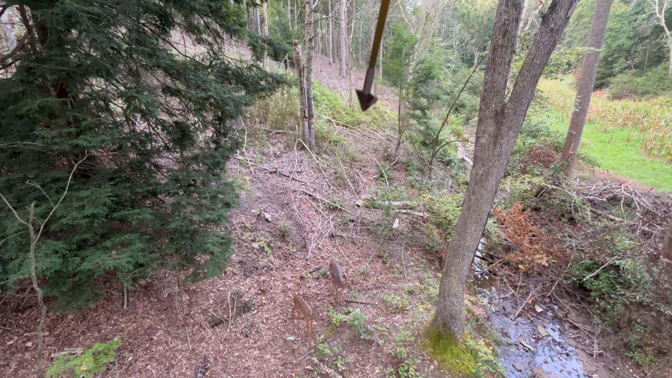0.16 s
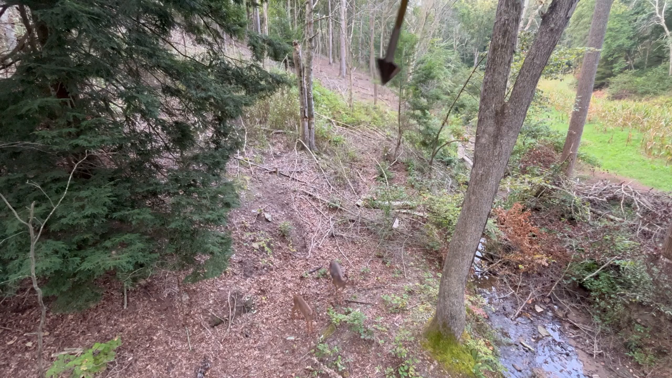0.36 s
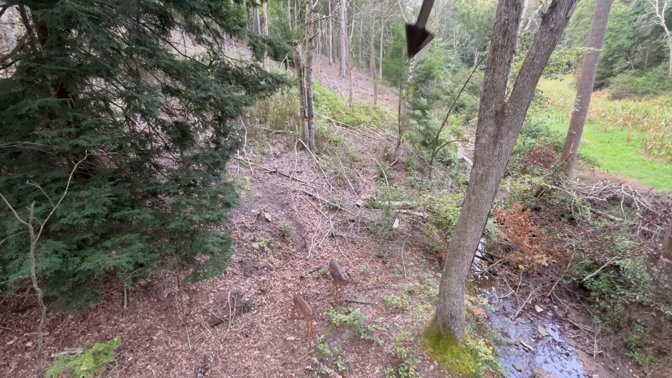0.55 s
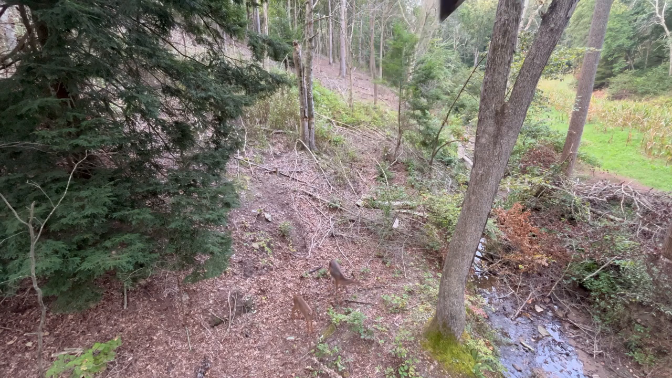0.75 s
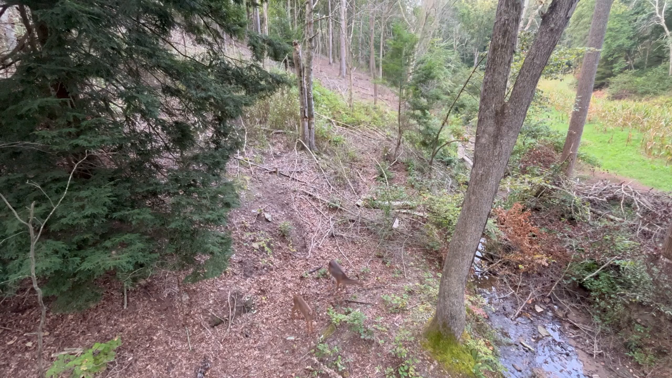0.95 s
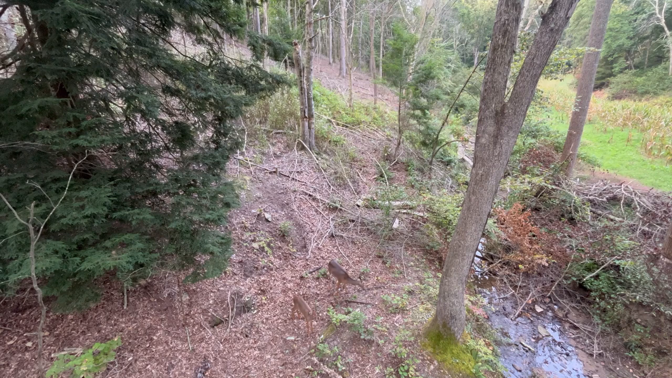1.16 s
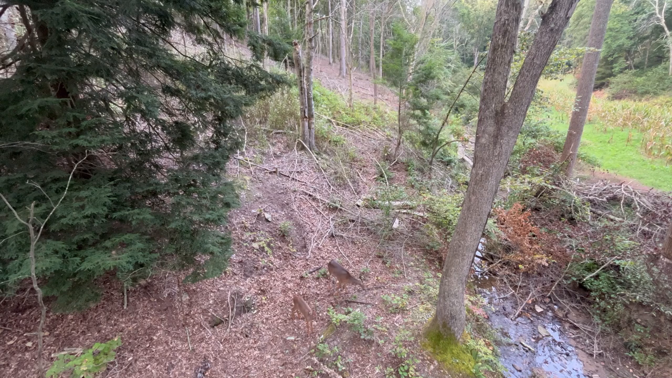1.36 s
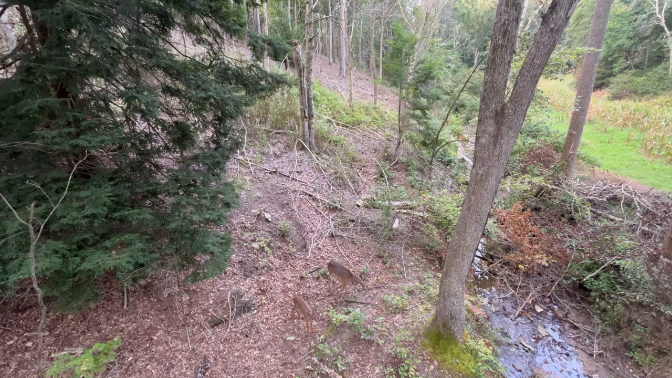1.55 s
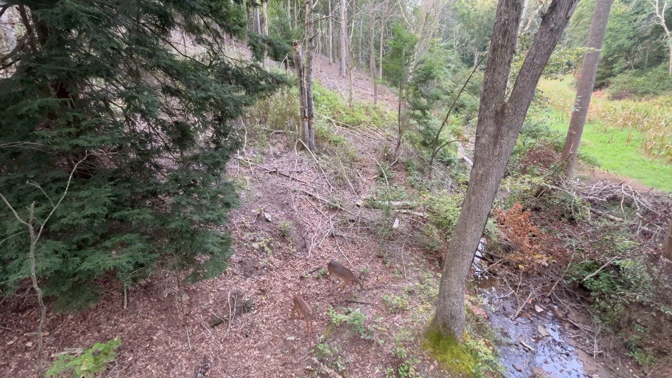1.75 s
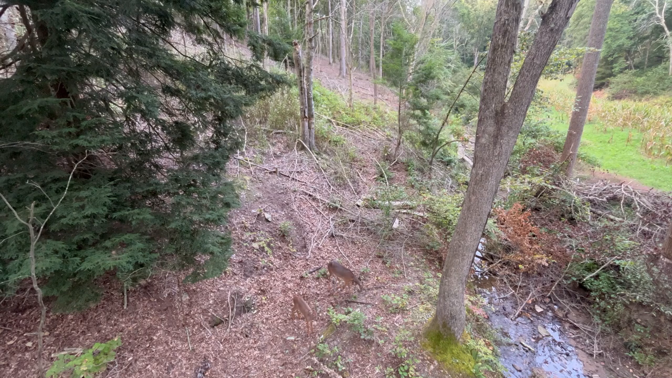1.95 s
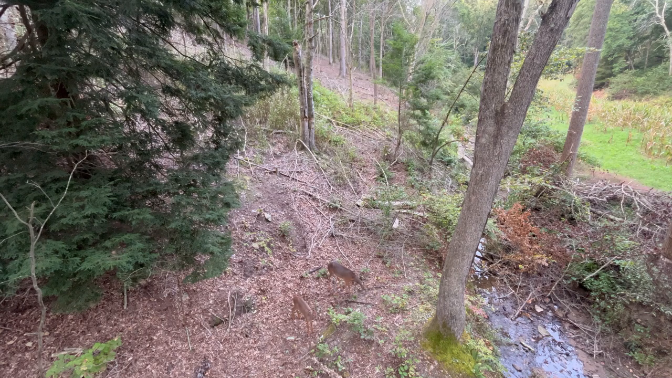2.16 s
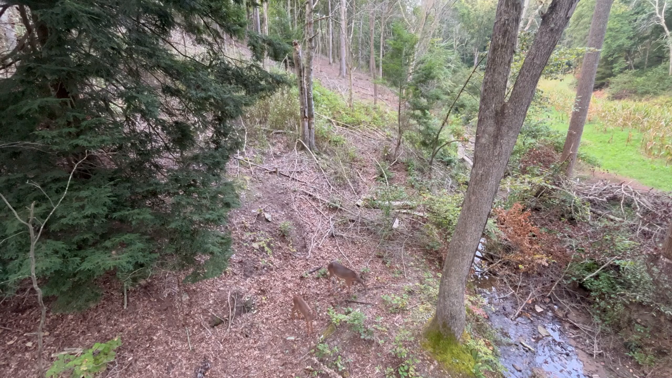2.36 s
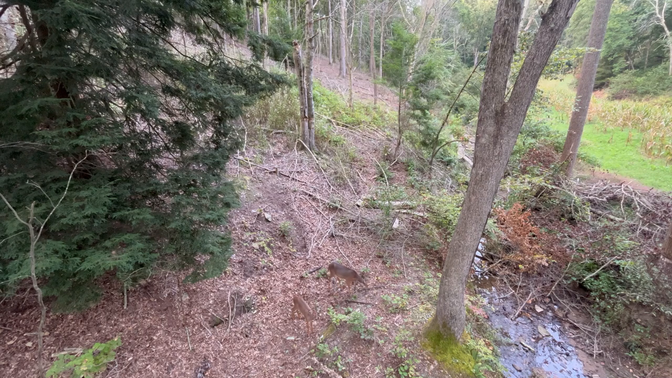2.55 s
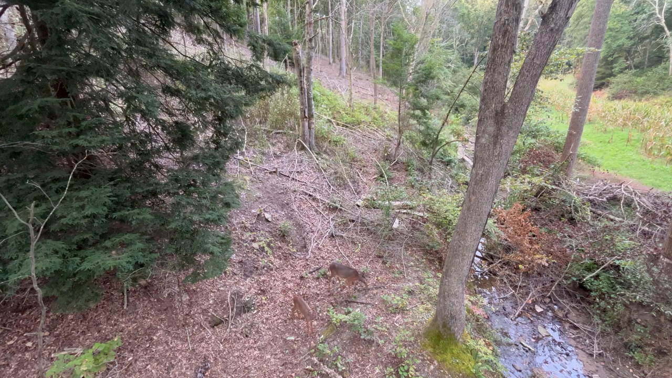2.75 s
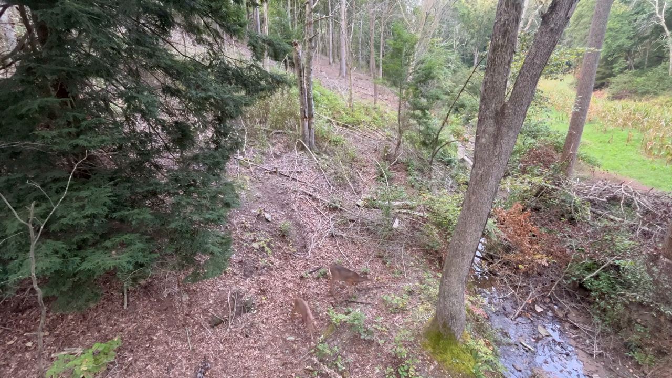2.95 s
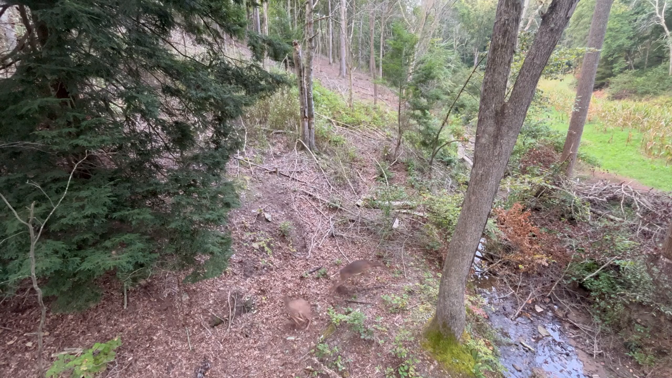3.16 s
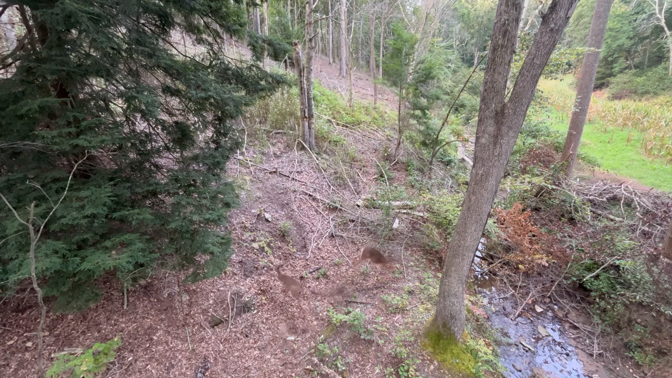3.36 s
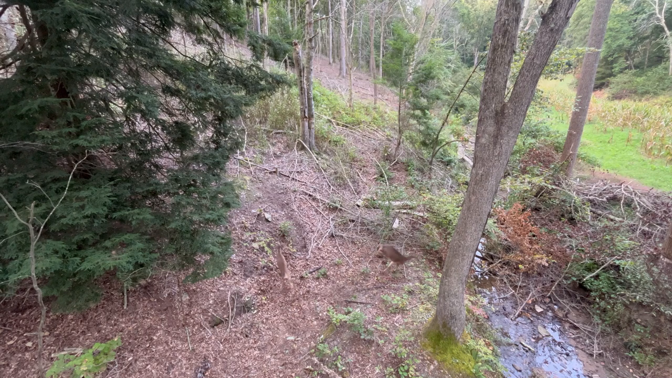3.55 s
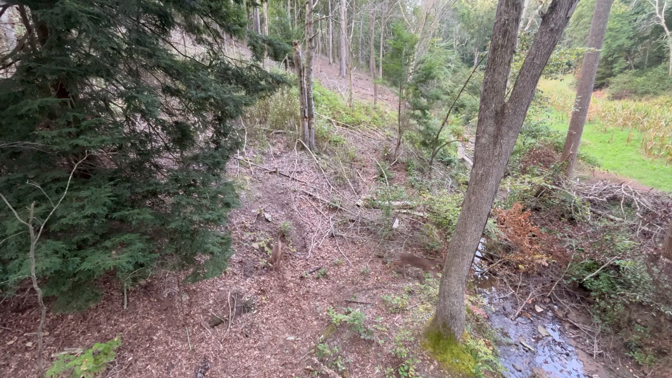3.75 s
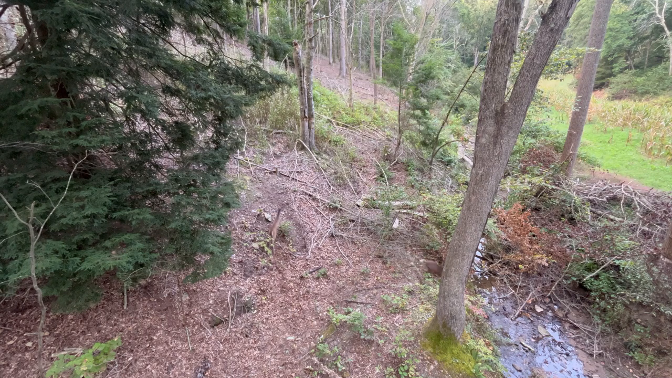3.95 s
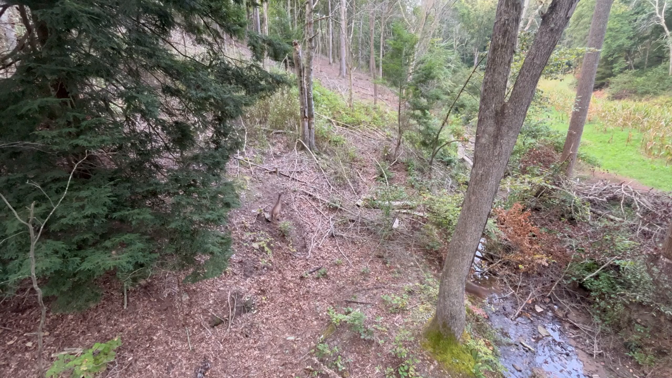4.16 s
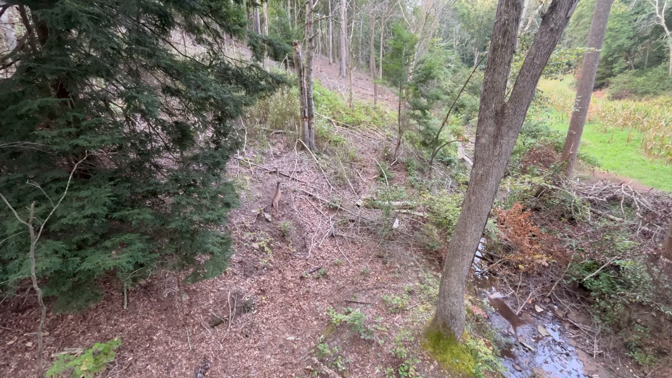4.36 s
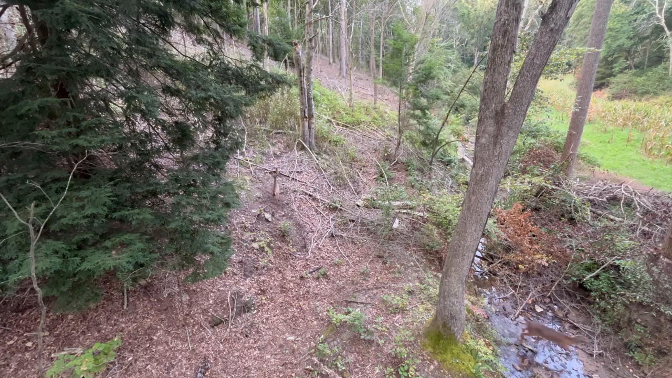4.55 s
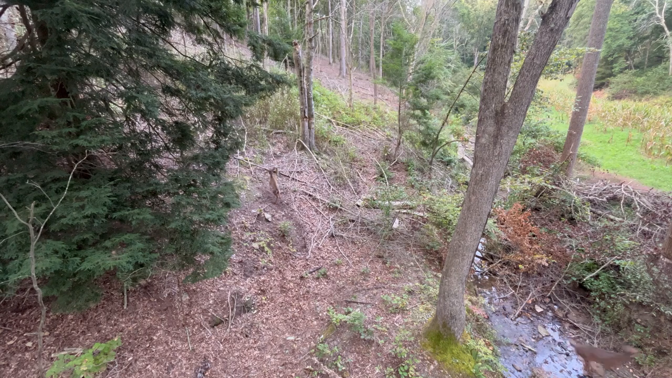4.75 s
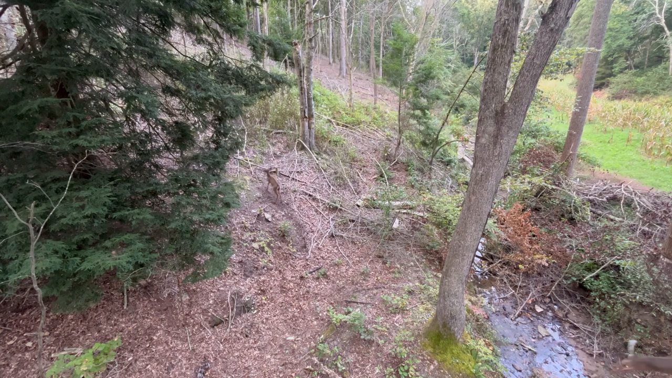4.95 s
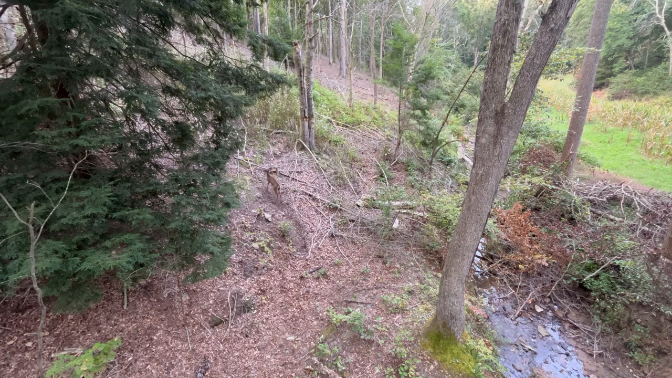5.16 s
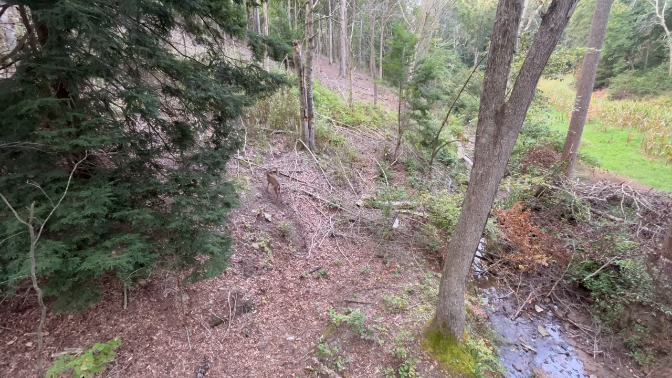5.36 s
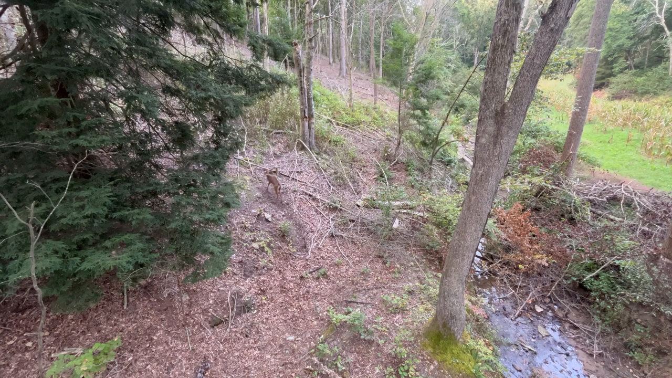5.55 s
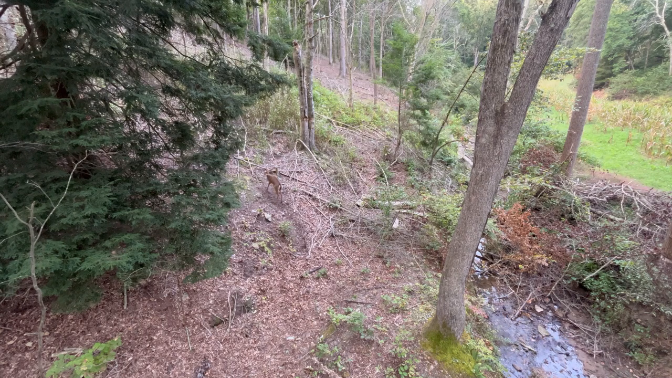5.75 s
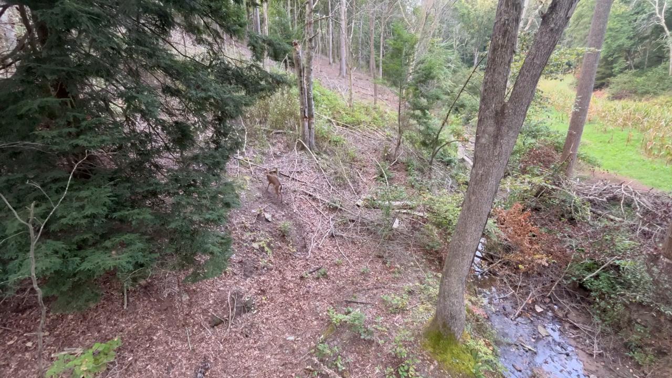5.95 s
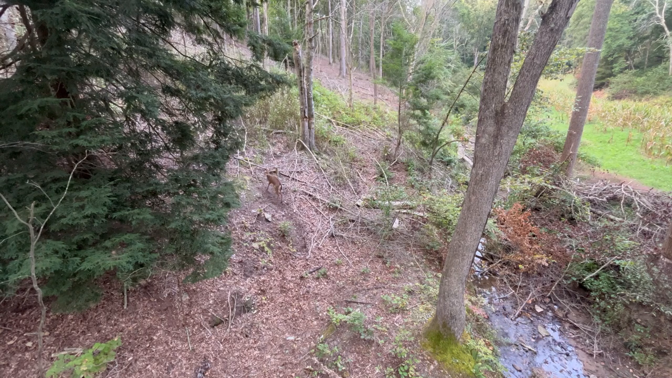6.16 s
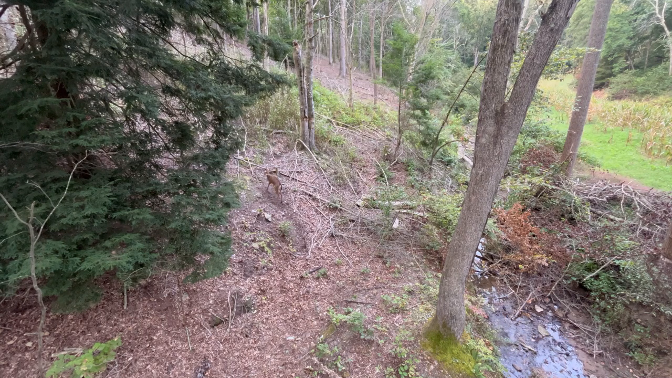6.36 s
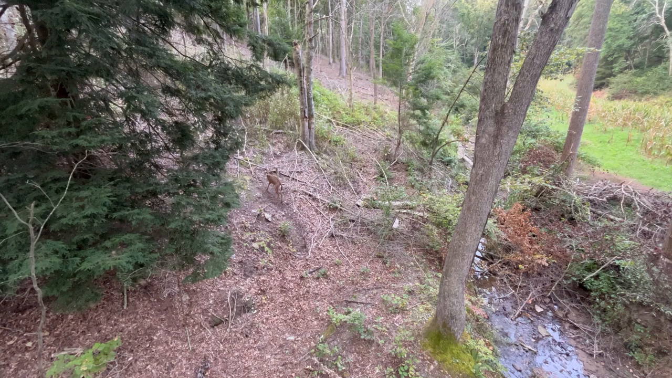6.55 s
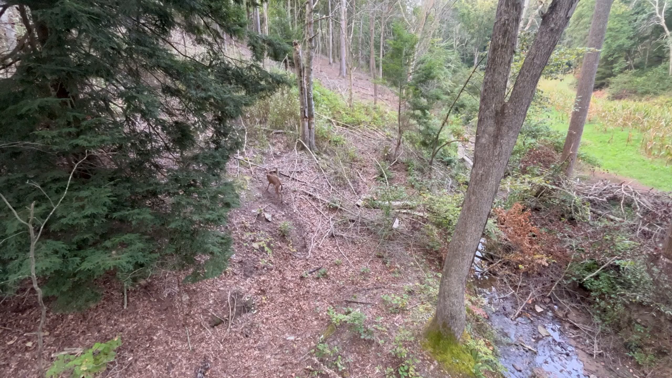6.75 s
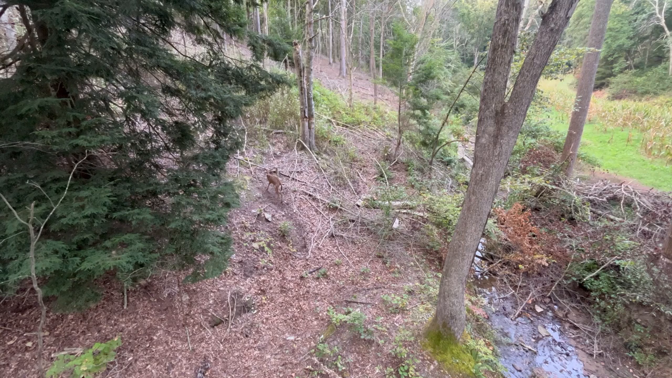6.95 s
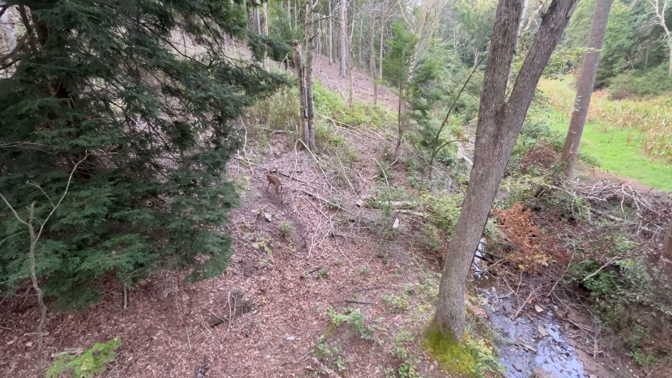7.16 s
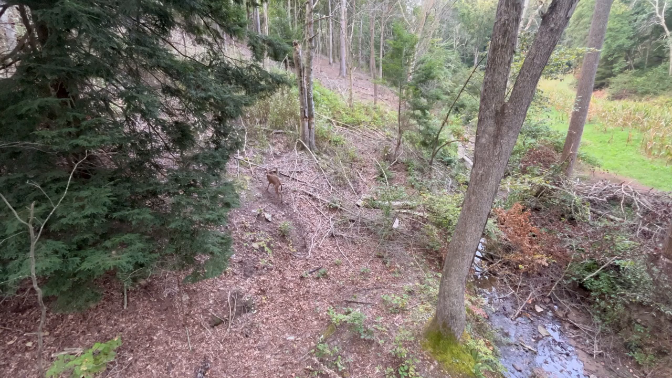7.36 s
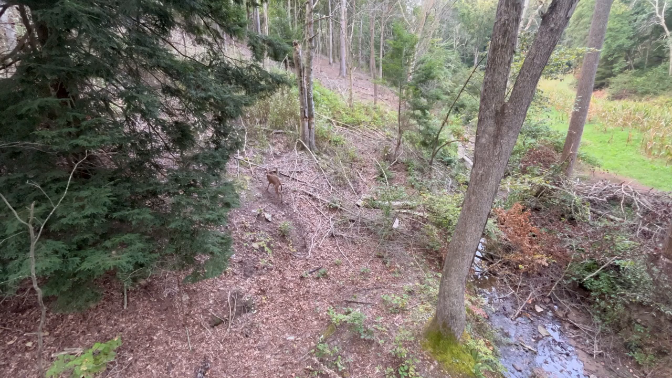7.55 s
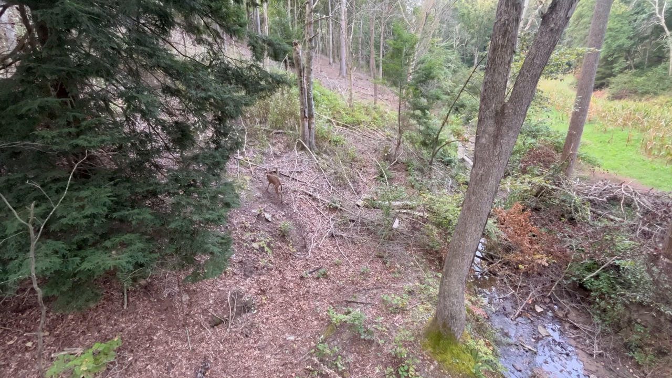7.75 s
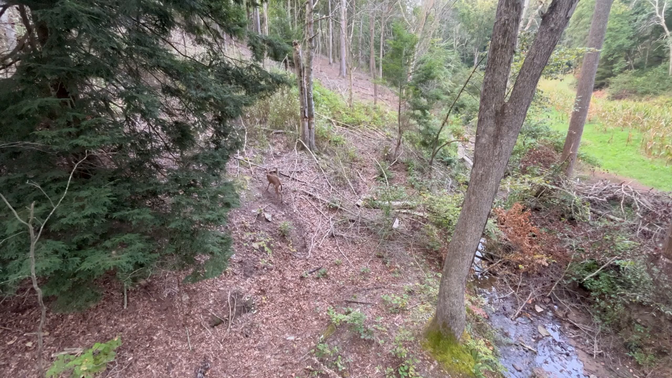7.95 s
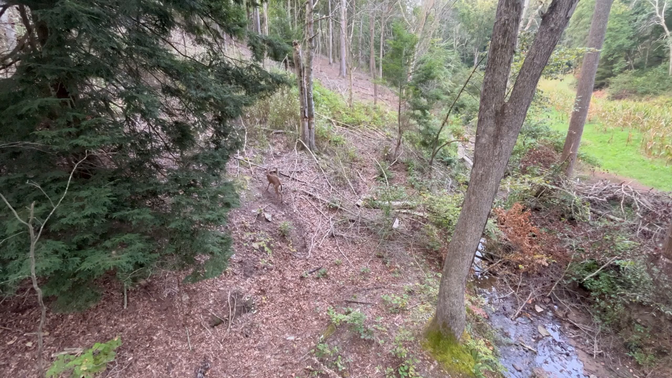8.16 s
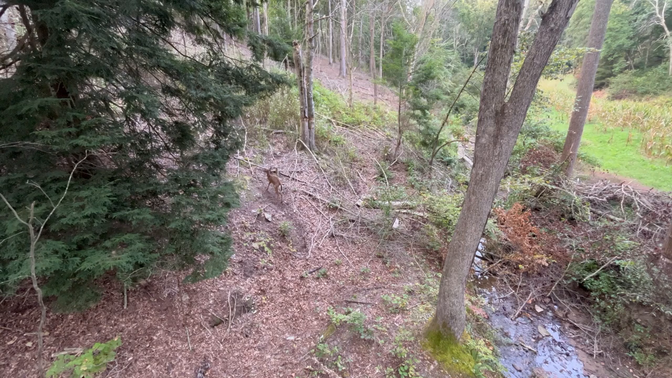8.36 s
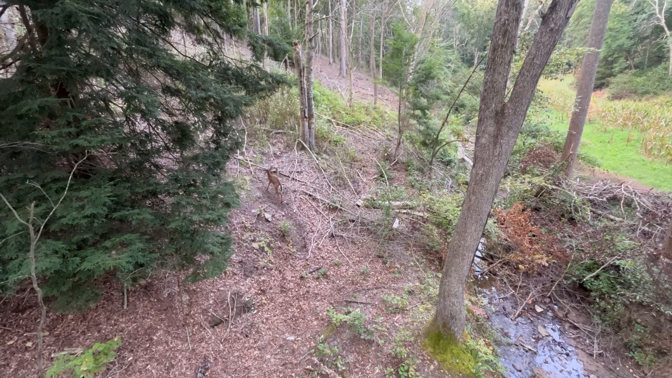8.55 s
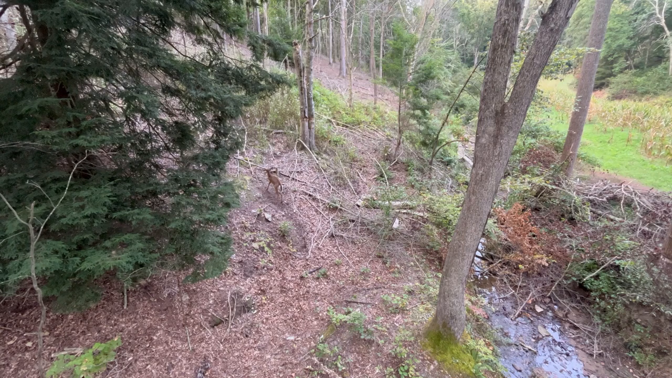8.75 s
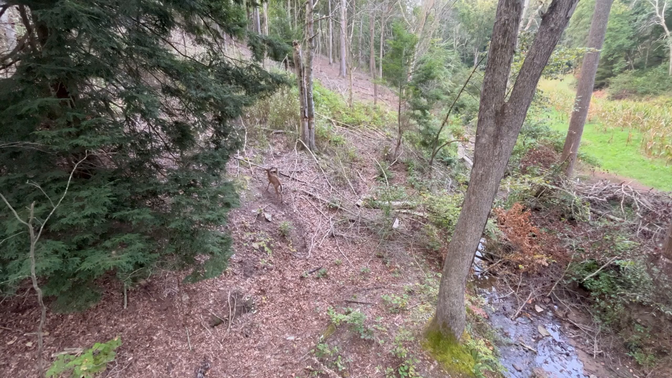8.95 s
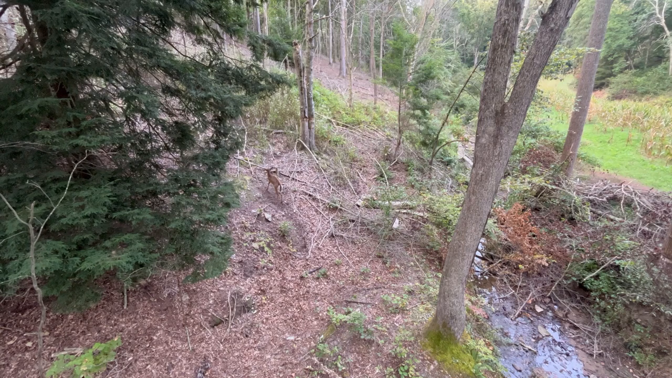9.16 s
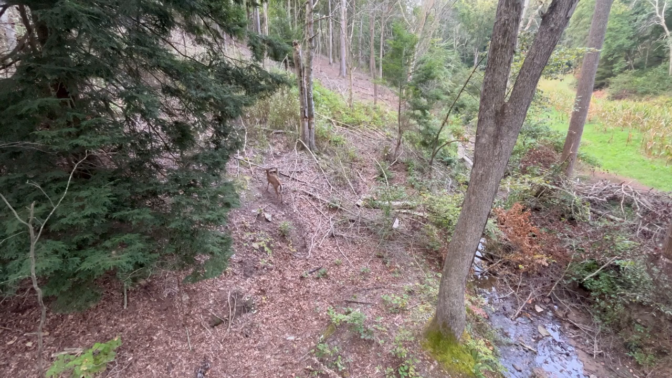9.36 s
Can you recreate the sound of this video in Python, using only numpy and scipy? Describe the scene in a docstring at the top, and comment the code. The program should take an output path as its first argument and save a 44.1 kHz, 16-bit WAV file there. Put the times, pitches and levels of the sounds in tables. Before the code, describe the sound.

Quiet woodland with a steady high insect trill, a nearer cricket chirping and soft air. A few faint leaf steps, then a hard, close bow thump with a brief rattling scrape. A deer bolts at once, crunching dry leaves and snapping twigs, the steps slowing and thinning. One short breathy snort follows, then sparse light footfalls under the insects. Stereo outdoor pickup near the bow, with faint echoes from the trees.

```python
"""In the woods a bow is loosed from a tree stand; a deer bolts through dry leaves, stops, snorts and steps about.
The bow is struck modes and a gritty scrape, the leaves are shaped crackle, the snort is noise in resonances.
A chorus of far insects trills around 4-5 kHz with one nearer cricket chirping, over far birds and a hush of air.
Two microphone ports with different colour hear the scene; the trees return a short tail of sparse echoes."""
import sys
import numpy as np
from scipy import signal
from scipy.fft import rfft, irfft
from scipy.io import wavfile
from scipy.ndimage import uniform_filter1d

SR = 44100
rng = np.random.default_rng(int(sys.argv[2]) if len(sys.argv) > 2 else 0)


def put_to_file(sound):
    """Save the sound as 16-bit audio at rate SR, in the file named by the first command-line argument."""
    columns = np.atleast_2d(sound).T  # one column per channel
    safe = np.clip(columns, -1, 1)
    whole_steps = np.round(safe * 32767)
    wavfile.write(sys.argv[1], SR, whole_steps.astype(np.int16))


def convert_level_to_amplitude(level_db):
    """Map a level in decibels to its linear amplitude factor."""
    exponent = np.asarray(level_db, float) / 20
    return 10 ** exponent


N = 414540


def evened(x):
    """Scales to rms 1."""
    return x / np.sqrt(np.mean(x ** 2) + 1e-20)


def read(points, hz):
    """Reads a spectrum table on a log-frequency axis."""
    f, value = np.transpose(points)
    return np.interp(np.log(hz + 1), np.log(f + 1), value)


def curve(points, t):
    """Reads a table as straight lines between its points."""
    return np.interp(t, *np.transpose(points))


def add(mix, s, sound):
    """Mixes a sound in at time s."""
    part = mix[..., round(s * SR):][..., :sound.shape[-1]]
    part += sound[..., :part.shape[-1]]


def colour(x, points):
    """Filters by a spectrum table."""
    hz = np.fft.rfftfreq(x.shape[-1], 1 / SR)
    return irfft(rfft(x) * convert_level_to_amplitude(read(points, hz)), x.shape[-1])


def tilt(hz, treble_db, bass_db, treble_hz, bass_hz):
    """Tips the treble from one edge up to 8 kHz and the bass below another edge."""
    treble = np.clip(np.log((hz + 1) / treble_hz) / np.log(8000 / treble_hz), 0, 1)
    bass = np.clip(np.log2(bass_hz / (hz + 1)) / 0.31, 0, 1)
    return np.multiply.outer(treble_db, treble) + np.multiply.outer(bass_db, bass)


def peak_db(t, top_s, top_db, rise, fade):
    """A level that climbs to its top and sinks again, in dB per second."""
    return top_db - np.where(t < top_s, rise * (top_s - t), fade * (t - top_s))


def slow(size):
    """A slowly wandering random curve of rms 1."""
    smooth = uniform_filter1d(rng.standard_normal(N), size)
    return evened(uniform_filter1d(smooth, size))


def resonate(x, hz, width):
    """Shifts the curve hz down to zero, smooths, and shifts back: a resonance of gain 1."""
    turn = np.exp(2j * np.pi * np.cumsum(hz * np.ones(len(x))) / SR)
    r = np.exp(-np.pi * width / SR)
    return 2 * (turn * signal.lfilter([1 - r], [1, -r], x / turn)).real


def ports(x, side, lead=((0, 0), (20000, 0))):
    """Splits a sound by level and phase; the sum keeps its level unless the ports nearly cancel."""
    hz = np.fft.rfftfreq(N, 1 / SR)
    ratio = convert_level_to_amplitude(read(side, hz))
    left = ratio * np.exp(1j * curve(lead, hz))
    both = np.array([left, np.ones(len(hz))])
    total = np.maximum(abs(both.sum(0)), 0.61 * np.sqrt(1 + ratio ** 2))
    return irfft(rfft(x) * both * 2 / total, N)


# blows inside the bow; a long contact rings only the low modes:
# (time [s], relative force [dB], contact [ms])
BLOWS = [(2.7578, -10.5, 0.32), (2.7598, -8, 1.36), (2.766, -8.5, 1.93), (2.7709, -6, 0.13),
         (2.776, -10, 0.11), (2.783, -1.5, 5.1), (2.7882, -5.5, 0.2), (2.798, -24.5, 0.32),
         (2.8, -9.5, 1.86), (2.808, -20, 0.15), (2.803, -4.5, 11), (2.83, -23, 0.074), (2.88, -25, 0.078),
         (2.898, -30.5, 0.2), (3.0, -23.5, 7.3), (3.067, -26.5, 3.4)]
# modes of limbs, riser and arrow rest: (frequency [Hz], relative level [dB], t60 [s])
BOW_MODES = [(61, -3.5, 0.15), (93, -9, 0.31), (124, -4.5, 0.045), (192, -4, 0.04), (300, -13.5, .05),
             (344, -14.5, 0.071), (440, 0.5, 0.07), (670, -11, 0.091), (800, -3.5, 0.036), (900, -5, 0.036),
             (1140, -5, 0.025), (1810, -15.5, 0.044), (2282, -12, 0.27), (2750, -4, 0.035),
             (3315, -2, 0.05), (4010, 1.5, 0.019), (4900, -3, 0.017), (6500, -7.5, 0.028),
             (7800, -1.5, .015)]


def bow_ring():
    """Each blow is a force pulse, a push and its rebound, that sets the bow's modes ringing."""
    t, force = np.arange(SR // 2) / SR, np.zeros(N)
    for s, db, contact_ms in BLOWS:
        push = np.diff(np.hanning(max(round(contact_ms * SR / 1000), 2) + 2))
        add(force, s, convert_level_to_amplitude(db) * push / abs(push).sum())
    out = np.zeros((2, N))
    for hz, db, t60 in BOW_MODES:
        # the ports hear each mode at different phases, more scattered the higher it lies
        phase = np.array([[0], [0.71 + hz / 1500 * rng.standard_normal()]])
        ring = convert_level_to_amplitude(db - 60 * t / t60) * np.sin(2 * np.pi * hz * t + phase)
        out += signal.oaconvolve(force[None], ring, axes=1)[:, :N]
    return 0.36 * out


# colour of the scrape: (frequency [Hz], relative level [dB])
SCRAPE_TONE = [(180, -38.5), (300, -9), (455, -6), (574, -6.5), (2000, -13.5), (2840, -12), (3700, -12.5),
               (7690, -15), (16000, -45.5)]
# the slide snags in bursts: (time [s], level [dB])
CATCHES = [(2.758, -11.5), (2.765, -20.5), (2.771, -13), (2.778, -13.5), (2.788, -21.5), (2.88, -35),
           (2.897, -36), (2.944, -40)]


def scrape():
    """String and arrow slide past the rest: a gritty hiss that swells, fades and stops, with snags."""
    t = np.arange(N) / SR
    grit = rng.standard_normal((2, N)) * convert_level_to_amplitude(3.5 * slow(size=40))
    end_s = 2.908
    slide_db = peak_db(t, 2.76, -30, rise=1900, fade=111) - 1500 * np.maximum(t - end_s, 0)
    level = convert_level_to_amplitude(slide_db)
    for s, db in CATCHES:
        level = level + convert_level_to_amplitude(peak_db(t, s, db, rise=9000, fade=3500))
    return evened(colour(grit, SCRAPE_TONE)) * level


# balance of the bow: (frequency [Hz], left over right [dB])
BOW_SIDE = [(60, -6), (130, -4.5), (290, 0), (640, 0), (1410, -3), (3100, -11), (6820, -5), (15000, 1)]


def bow():
    """Struck modes with the scrape under them, each channel coloured by its own port."""
    out = bow_ring() + scrape()
    return np.array([ports(out[k], BOW_SIDE)[k] for k in range(2)])


# phase between the ports for the deer: (frequency [Hz], left leads by [rad])
DEER_LEAD = [(0, 0), (3270, -9.5), (4820, -14.5), (6800, -15.5), (10200, -27.5), (15800, -27),
             (16200, -20.5)]


def crackle():
    """Dense random clicks over noise, partly shared by the ports."""
    clicks = convert_level_to_amplitude(4.5 * np.minimum(rng.exponential(1, (3, N)), 4)) * rng.standard_normal((3, N))
    clicks *= rng.random((3, N)) < 3500 / SR  # about 3500 clicks a second
    bed = evened(clicks) + 0.6 * rng.standard_normal((3, N))
    bed *= convert_level_to_amplitude(1.5 * slow(size=200))  # leaves give way in clumps
    level_sides = ((1, 0.0022), (20000, 0))  # practically equal level in both ports
    return 0.38 * ports(bed[0], level_sides, DEER_LEAD) + 0.8 * bed[1:]


# rustling bed: loud as the deer bolts, sinking, swelling softly again as the snort dies away:
# (time [s], level [dB])
RUSTLE = [(0, -71.5), (1.9, -70.5), (2.3, -78.5), (2.85, -75), (2.9, -59), (3.1, -52.5), (3.25, -60.5),
          (3.8, -57.5), (3.95, -58.5), (4.8, -65.5), (5.3, -65.5), (5.65, -74), (6.2, -68.5), (6.9, -75.5),
          (9.4, -76.5)]
BUSY_DB = -56.5  # the bed level from which crispness, weight and rumble are reckoned
# single steps and scuffs:
# (time [s], crunch level [dB], length [s], dryness as treble [dB], weight as bass [dB])
STEPS = [(0.074, -55.5, 0.02, -7, 6), (0.347, -62.5, 0.0033, 6, 14.5), (1.284, -53, 0.021, -15.5, -11),
         (1.795, -55, 0.031, -15, -4.5), (2.086, -72, 0.032, -9, 18.5), (2.952, -52.5, 0.0054, 7.5, -10),
         (3.002, -41, 0.011, -1.5, 6.5), (3.073, -40, 0.023, -10.5, -3.5), (3.163, -51.5, .009, 8, 2),
         (3.305, -44, 0.0044, 3.5, -12), (3.532, -52.5, 0.031, 3, -0.5), (3.627, -47.5, 0.03, 3, -11),
         (3.754, -48.5, 0.081, -1, -5.5), (3.996, -40.5, 0.025, -17, -11), (4.283, -56, 0.029, 2, -6),
         (4.442, -37, 0.015, -19, -14), (4.59, -43.5, 0.023, -6.5, -11), (4.717, -42, 0.017, -10, -16),
         (4.879, -39.5, 0.014, -14.5, -5), (5.059, -50.5, 0.024, 0, -14), (5.15, -48.5, 0.029, -8, -25),
         (5.325, -45.5, 0.016, -3, -3.5), (5.352, -53.5, 0.026, -1.5, 2.5), (6.286, -52.5, 0.02, -10, -5.5),
         (6.6, -62.5, 0.024, -9.5, 2), (6.754, -59, .026, -8.5, -3.5), (7.227, -60.5, 0.036, -7, -0.5),
         (7.854, -55, 0.015, 2.5, -4), (8.091, -62.5, 0.041, -16.5, -0.5), (8.491, -62, 0.015, -1, -9.5),
         (8.798, -58, 0.027, -5.5, -4), (8.291, -74, .018, -9.5, -6), (9.025, -65.5, 0.042, -24, -7),
         (9.312, -63.5, 0.04, -24.5, -3)]
# colour of the leaves: (frequency [Hz], relative level [dB])
LEAVES = [(24, -26), (40, -2), (99, 2.5), (185, -6), (297, -0.5), (363, -9.5), (942, -14), (1040, -15),
          (2150, -13), (3560, -14.5), (8990, -12.5), (12800, -28.5), (15600, -20.5), (16100, -44.5)]
# balance of the deer: (frequency [Hz], left over right [dB])
DEER_SIDE = [(60, 5), (120, -7.5), (240, 2.5), (480, 1.5), (950, 3), (1890, 2.5), (3770, -9), (7520, -1),
             (15000, 1)]
# how the rustling shifts between the sides as the deer moves: (time [s], left over right [dB])
DEER_PATH = [(0, -2.5), (2.9, -0.5), (3.5, 8), (4.1, 3), (5.4, 0), (7.8, 2), (9.4, 3.5)]


def rustle():
    """Crackle shaped by a running bed plus one swell a step, quick to rise and slower to settle."""
    hz, t, z = signal.stft(crackle(), SR, nperseg=256, noverlap=192)
    patches = uniform_filter1d(rng.standard_normal(z.shape[1:]), size=5, axis=0)
    z *= convert_level_to_amplitude(3 * evened(uniform_filter1d(patches, size=9, axis=1)))  # each leaf crackles in its own band

    bed_db = curve(RUSTLE, t)
    dry_db = 4.5 + 0.5 * (bed_db - BUSY_DB)  # a louder bed is crisper
    weight_db = -1.7 - 0.14 * (bed_db - BUSY_DB)  # and thinner
    wander = np.interp(t * SR, np.arange(N), slow(size=1500))
    bed_db = bed_db + 3.5 * wander  # the rustling comes and goes
    power = convert_level_to_amplitude(bed_db + tilt(hz, dry_db, weight_db, 1400, 520).T) ** 2

    s, crunch_db, length, dry_db, weight_db = np.transpose(STEPS)
    since = t - s[:, None]
    late = since / np.maximum(length, .0025)[:, None]
    swell = convert_level_to_amplitude(np.where(late < 0, -7 * late ** 2, -5 * abs(late) ** 2.85))
    settle = (late > 0) * convert_level_to_amplitude(-8 - 60 * abs(since) / 0.4)  # leaves keep settling, t60 0.4 s
    swell = np.maximum(swell, settle)
    step_gain = convert_level_to_amplitude(crunch_db[:, None] + tilt(hz, dry_db, weight_db, 950, 940))
    power = power + step_gain.T ** 2 @ swell ** 2

    half_db = (read(DEER_SIDE, hz)[:, None] + curve(DEER_PATH, t)) / 2
    tone = evened(convert_level_to_amplitude(read(LEAVES, hz)))[:, None]
    z *= np.sqrt(power) * tone * convert_level_to_amplitude(np.array([half_db, -half_db]))
    return signal.istft(z, SR, nperseg=256, noverlap=192)[1][:, :N]


# colour of the fixed nose cavities: (frequency [Hz], relative level [dB])
NOSE = [(120, -40), (300, -22), (700, -22), (1250, -10), (1550, -12), (2150, -8), (3000, -13), (4050, -9),
        (7500, -19), (10000, -28), (15000, -46)]
# thumps of the chest: (time [s], frequency [Hz], level [dB])
CHEST = [(5.76, 186, -46.5), (5.778, 90, -47.5)]


def snort():
    """A blast of turbulent air through the nose, kicked off by a thump of the chest."""
    top_s, top_db = 5.865, -32.5
    rise_s, fade_s = 0.114, 0.2
    late = np.arange(-rise_s, fade_s, 1 / SR)
    rising = 21.5 * abs(late / rise_s) ** 2.97
    fading = 21.5 * abs(late / fade_s) ** 1.285
    under_db = np.where(late < 0, rising, fading)
    jet = rng.standard_normal(len(late)) * convert_level_to_amplitude(0.6 * slow(size=120)[:len(late)])  # the jet flutters

    # the nostrils ring higher as the blast builds, then close
    nostril_hz = np.maximum(960 - 55 * under_db * (late < 0) - 3200 * late, 300)
    nostril = resonate(resonate(jet, nostril_hz, 260), nostril_hz, 360)
    nose = evened(colour(jet, NOSE)) + convert_level_to_amplitude(-5) * evened(nostril)

    # the nostrils flare and rasp at the height of the blast
    flare_s, flare_length_s, flare_hz = 5.79, 0.1202, 2050
    since = late + top_s - flare_s
    flare = np.clip(np.minimum(since, flare_length_s - since) / .015, .1, 1)
    rasp = resonate(resonate(jet, flare_hz, 800), flare_hz, 800)
    nose = nose + convert_level_to_amplitude(-1.5) * flare * evened(rasp)

    ramps = np.clip(np.minimum((late - late[0]) / 0.0026, (late[-1] - late) / 0.077), 0, 1)
    out = np.zeros(N)
    add(out, top_s - rise_s, convert_level_to_amplitude(top_db - under_db) * evened(nose) * ramps)
    t = np.arange(round(0.026 * SR)) / SR
    for s, hz, db in CHEST:
        add(out, s, convert_level_to_amplitude(db) * np.hanning(len(t)) * np.sin(2 * np.pi * hz * t))
    return ports(out, DEER_SIDE, DEER_LEAD)


# modes of a twig: (frequency [Hz], relative level [dB], t60 [s])
TWIG = [(720, -5.5, 0.095), (1440, -13, 0.23), (3000, 0, 0.043), (4170, -7, 0.18), (4800, 0, .02),
        (6570, 7.5, 0.022)]
# twigs, crisp leaves and gear ticking:
# (time [s], relative level [dB], body as bass [dB], edge as treble [dB], left over right [dB])
SNAPS = [(.067, -41.5, 5, -9.5, 13), (.074, -45, 2, -16, 8), (.193, -50, -25, 3, 3), (0.343, -37, 1, -4, 6),
         (.929, -46.5, -8, 3, 5), (1.806, -45.5, 31, -17, 2), (2.569, -55.5, -25.5, 10, 5),
         (2.9806, -29.5, -1, 4.5, 2), (3.068, -32, 5, 0.7, 3), (3.102, -31.5, -1, -20, 3),
         (3.131, -27.5, -10.5, 14.5, 2), (3.288, -35, -6, 6.5, 0), (3.302, -35.5, -7.5, 10.5, -2),
         (3.427, -38, -0.5, -3.5, 0), (3.901, -40, -13, 16, 0), (3.974, -32.5, -20, -21.5, 10),
         (4.093, -40.5, -9, 5, 11), (4.357, -43.5, -25, 4, 0.1), (4.434, -30, -3.5, -22, 0),
         (4.575, -44.5, -11, -13, 7), (4.597, -35.5, 2.5, 0.5, 3), (4.701, -26, -2.5, -18.5, -6.5),
         (4.748, -39.5, -17, -6.5, -1), (4.943, -43, -12, 3, 2), (5.019, -39.5, -19, -30.5, 2),
         (5.037, -32.5, -26, -14, -4), (5.138, -37, -4.5, -48, -7), (6.053, -37, -10, -20, 4),
         (6.281, -42, -7, -23.5, 5), (7.855, -38.5, -16, -1.5, 4), (8.467, -43, -10, 1.5, 2),
         (8.798, -46.5, 2, 0, -2)]


def snaps():
    """A wide sharp crack and a patter of bits; the loud ones are twigs and ring."""
    out, t = np.zeros((2, N)), np.arange(4096) / SR
    hz = np.fft.rfftfreq(len(t), 1 / SR)
    twig = sum(convert_level_to_amplitude(db - 60 * t / t60) * np.sin(2 * np.pi * f * t) for f, db, t60 in TWIG)
    tone = convert_level_to_amplitude(read([(100, -9), (500, 0.0), (9000, -2.5), (16000, -17.5)], hz))
    decay = 0.83 * convert_level_to_amplitude(-60 * t / 0.0047) + 0.2 * convert_level_to_amplitude(-60 * t / .06)  # crack, then patter
    for s, db, body_db, edge_db, pan_db in SNAPS:
        bits = rng.standard_normal((3, len(t)))
        bits = 0.5 * bits[0] + 1.1 * bits[1:]  # partly shared by the ports
        bits = irfft(rfft(bits) * tone * convert_level_to_amplitude(tilt(hz, edge_db, body_db, 4900, 2600)))
        snap = evened(bits) * decay + 0.5 * np.clip((db + 29.0) / 9, 0, 1) * twig
        pan = np.array([[pan_db], [-pan_db]]) / 2
        add(out, s, convert_level_to_amplitude(db + pan) * snap * np.minimum(t / 0.00023, 1))
    return out


# short pitched knocks: hooves and gear, ringing twigs and leaves, soft far thuds:
# (time [s], frequency [Hz], relative level [dB], rise [s])
KNOCKS = [(.212, 3430, -58, 0.004), (.214, 2800, -65, .003), (1.39, 945, -61, 0.0025),
          (2.793, 2140, -27.5, 0.0027), (2.859, 1197, -42.5, .003), (2.897, 930, -45.5, 0.0032),
          (2.955, 4660, -45, .002), (2.959, 772, -42, 0.0013), (2.98, 651.6, -40.5, 0.0014),
          (2.983, 340, -38, 0.0045), (2.989, 946, -41.5, .003), (3.01, 810, -44.5, .003),
          (3.024, 300, -46, 0.0039), (3.051, 654, -44, 0.0018), (3.067, 957, -40, 0.0036),
          (3.069, 420, -46.5, 0.003), (3.132, 432, -48, 0.0025), (3.615, 2190, -53, 0.0082),
          (3.794, 522, -52, .007), (3.974, 3220, -42, 0.0017), (4.434, 1290, -41.5, 0.0012),
          (4.432, 2640, -45.5, .002), (4.443, 2200, -48, .002), (4.871, 2400, -44, 0.0022),
          (5.037, 4920, -41.5, 0.0014), (5.139, 2115, -46, 0.0016), (5.14, 1180, -52, 0.0028),
          (8.06, 766, -70, 0.013), (8.27, 800, -69, 0.012), (8.286, 3100, -71, .003),
          (8.465, 2215, -64, .003), (8.5, 710, -68, 0.012), (8.606, 3100, -63, .003),
          (8.797, 2205, -64, .003), (9.0, 773, -71, 0.013), (9.29, 768, -72.5, 0.01)]


def knocks():
    """Each knock is a short rough ring in one resonance, wider the higher it lies."""
    out, t = np.zeros(N), np.arange(round(.12 * SR)) / SR
    for s, hz, db, rise in KNOCKS:
        puff = resonate(rng.standard_normal(len(t)), hz, 150 + .2 * hz)
        puff = evened(resonate(puff, hz, 250 + .2 * hz))
        ring = np.minimum(.004 / rise, 1) * np.sin(2 * np.pi * hz * t)  # quick knocks ring purer
        swell = t / rise * np.exp(1 - t / rise)
        add(out, s, convert_level_to_amplitude(db) * evened(ring + .4 * puff) * swell)
    return ports(out, DEER_SIDE, DEER_LEAD)


# decay of the echoes among the trees: (frequency [Hz], t60 [s])
TREES = [(100, .6), (900, .8), (2100, .35), (5000, .8), (14000, .1)]


def trees(x):
    """Sparse echoes of random sign from the trunks, each band dying at its own speed."""
    taps = np.zeros((2, SR))
    at = np.arange(500, SR - 20, 20) + rng.integers(0, 20, (2, (SR - 501) // 20))
    np.put_along_axis(taps, at, rng.choice([-1., 1.], at.shape), 1)
    hz, t, z = signal.stft(taps, SR, nperseg=256)
    z = z * convert_level_to_amplitude(-60 * t / read(TREES, hz)[:, None])
    tail = signal.istft(z, SR, nperseg=256)[1]
    return signal.fftconvolve(x, tail / np.linalg.norm(tail[0]), axes=1)[:, :N]


# strokes within a chirp: (time before the last stroke [s], relative level [dB])
STROKES = [(0, 2.5), (.064, 2), (0.123, 1), (0.177, -1), (.218, 2)]
# chirps of the near cricket: (time of the last stroke [s], strokes [count], relative level [dB])
CHIRPS = [(.312, 4, -55), (.941, 3, -53), (1.589, 4, -54), (2.333, 5, -55), (4.458, 4, -57),
          (5.653, 4, -57), (6.584, 2, -57), (7.625, 3, -56), (8.499, 4, -54), (9.128, 4, -54)]


def cricket():
    """The near cricket files short tones in groups; each stroke sags in pitch."""
    out, t = np.zeros(N), np.arange(round(0.021 * SR)) / SR
    # starts at 4490 Hz and falls by 11 kHz per second
    stroke = np.hanning(len(t)) * np.sin(2 * np.pi * (4490 - 5500 * t) * t)
    for s, strokes, db in CHIRPS:
        for before, stroke_db in STROKES[:round(strokes)]:
            add(out, s - before - .008, convert_level_to_amplitude(db + stroke_db) * stroke)
    return out


# far singers: (mean frequency [Hz], mean stroke rate [1/s], mean level [dB])
TRILLS = [(4850, 60, -67), (5070, 60, -66.5)]


def trills():
    """Far singers: wavering tones, beaten by quick strokes and swelling slowly."""
    t, out = np.arange(N) / SR, np.zeros(N)
    for hz, strokes, db in TRILLS:
        beat = .5 + .5 * np.sin(2 * np.pi * strokes * t + 4 * slow(size=900))
        tone = np.sin(2 * np.pi * np.cumsum(hz + 60 * slow(size=500)) / SR)
        out += convert_level_to_amplitude(db + 4.0 * slow(size=3000)) * beat * tone
    return out


# far, thin whistles: (time [s], length [s], first frequency [Hz], last frequency [Hz], level [dB])
BIRDS = [(.185, .11, 2250, 2620, -75), (1.38, .075, 3500, 3450, -75), (1.47, .19, 3360, 3230, -74),
         (9.315, .09, 8250, 9750, -78)]


def birds():
    """Thin gliding whistles far off."""
    out = np.zeros((2, N))
    for s, length, first_hz, last_hz, db in BIRDS:
        u = np.linspace(0, 1, round(length * SR))
        hz = last_hz + (first_hz - last_hz) * (1 - u) ** 2
        hz = hz + 25 * slow(size=300)[:len(u)]  # the whistle wavers
        add(out, s, convert_level_to_amplitude(db) * np.sin(np.pi * u) * np.sin(2 * np.pi * np.cumsum(hz) / SR))
    return out


# hush of air and the blended chorus: (frequency [Hz], relative level [dB])
AIR_TONE = [(18, -41.5), (30, -14), (106, 1.5), (149, -10), (287, -9.5), (866, -34), (2680, -37.5),
            (3310, -27), (4080, -7), (5040, -9), (5740, -14.5), (7270, -30), (8520, -28.5), (10800, -50),
            (16000, -56.5)]
# balance of air and insects: (frequency [Hz], left over right [dB])
AIR_SIDE = [(60, 0.5), (130, 0), (290, 6.5), (640, 5.5), (1410, -2.5), (3100, -8.5), (6820, -9.5),
            (15000, 10.5)]
# how alike the two ports hear the air: (frequency [Hz], likeness [0-1])
AIR_SAME = [(60, 1), (200, 0.54), (400, 0.49), (1000, 0.67), (5000, 0.11), (12000, 0.26)]


def air():
    """Random short-time spectra with small drifting patches and wide slow swells."""
    frames, hz = N // 256 + 5, np.fft.rfftfreq(1024, 1 / SR)
    a, b, c, d, drift = rng.standard_normal((frames, 513, 5)).T
    swells = evened(uniform_filter1d(uniform_filter1d(drift, 40, 0), 40, 1))
    patches = evened(uniform_filter1d(uniform_filter1d(drift, 14, 0), 8, 1))
    same = np.clip(read(AIR_SAME, hz), -1, 1)[:, None]
    left = a + 1j * b
    right = same * left + np.sqrt(1 - same ** 2) * (c + 1j * d)
    half_db = read(AIR_SIDE, hz)[:, None] / 2
    level_db = read(AIR_TONE, hz)[:, None] + 1.6 * patches + 1.1 * swells
    z = np.array([left, right]) * convert_level_to_amplitude(level_db + np.array([half_db, -half_db]))
    both = signal.istft(z, nperseg=1024, noverlap=768)[1][:, :N]
    return convert_level_to_amplitude(-60.5) * both / np.std(both.mean(0))


def rumble():
    """The rush shakes the ground: low resonant noise follows the level of the rustling bed."""
    hz, width = 108 / 1.4, 108
    over_db = curve(RUSTLE, np.arange(N) / SR) - BUSY_DB
    noise = resonate(resonate(rng.standard_normal(N), hz, width), hz, width)
    return convert_level_to_amplitude(-60.5 + 0.47 * over_db) * evened(noise)


def hum():
    """A faint far hum, noise in a narrow resonance, swells once."""
    size, hz = round(1.0 * SR), 285
    noise = resonate(resonate(rng.standard_normal(size), hz, 30), hz, 30)
    out = np.zeros(N)
    add(out, 7.05, convert_level_to_amplitude(-71.5) * np.hanning(size) * evened(noise))
    return out


def scene():
    """Near bow, deer among the trees, insects, birds, air, a low rumble and a far hum."""
    shot = bow()
    deer = rustle() + snort() + snaps() + knocks()
    tail = trees(convert_level_to_amplitude(-28.0) * shot + convert_level_to_amplitude(-20) * deer)
    insects = ports(cricket() + trills(), AIR_SIDE)
    return shot + deer + tail + insects + birds() + air() + rumble() + hum()


def band_limit(x):
    """A steep low-pass at the top of the band."""
    return signal.sosfilt(signal.butter(12, 16600, fs=SR, output="sos"), x)


def record(dry):
    """The microphone drops the deepest bass, below 42 Hz."""
    high_pass = signal.butter(3, 42, "high", fs=SR, output="sos")
    mix = signal.sosfilt(high_pass, dry)
    return band_limit(mix)


dry = scene()
out = record(dry)
put_to_file(out)
```